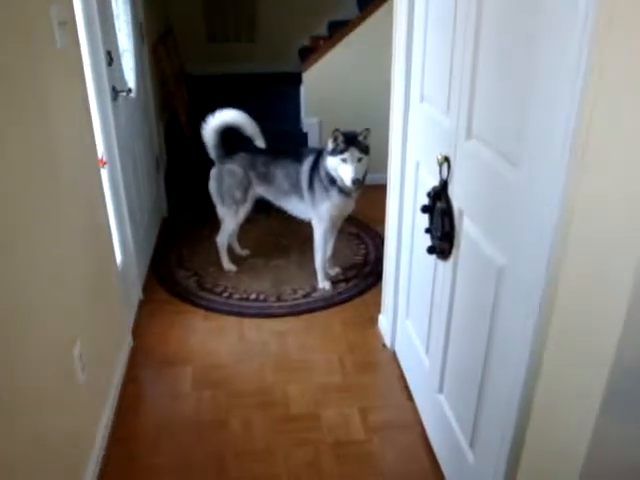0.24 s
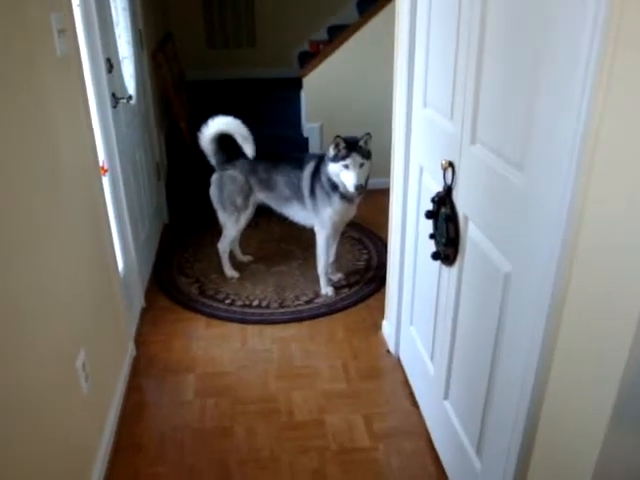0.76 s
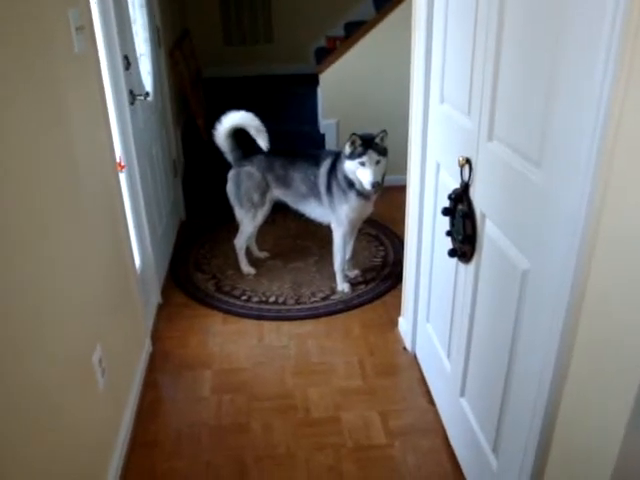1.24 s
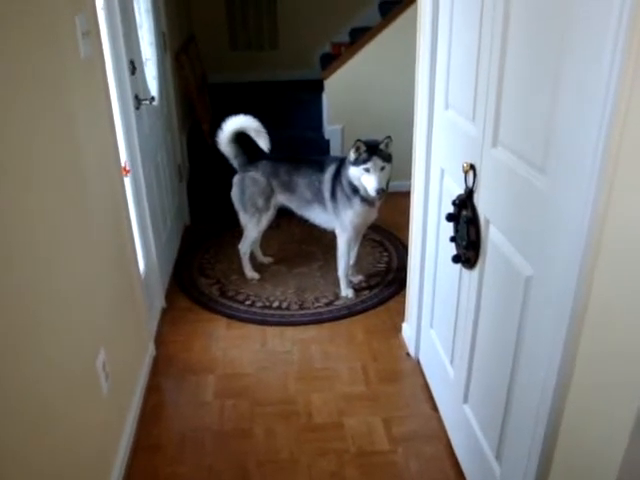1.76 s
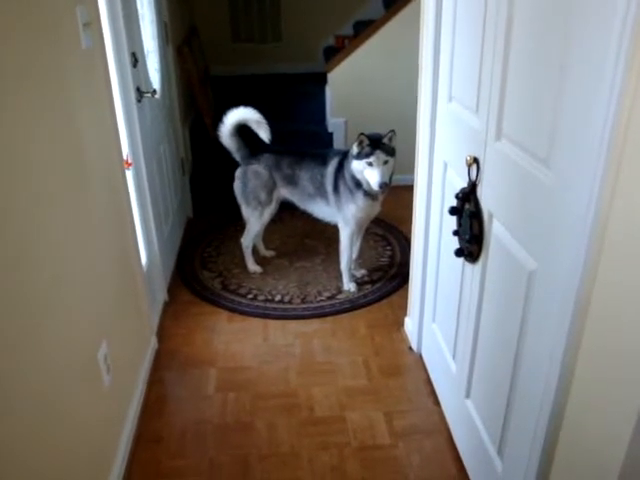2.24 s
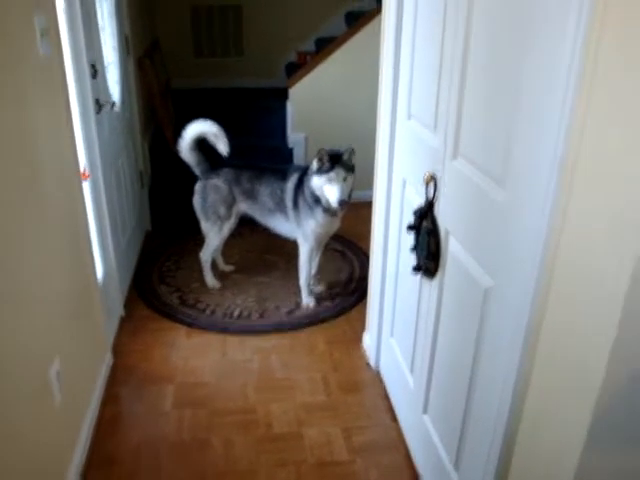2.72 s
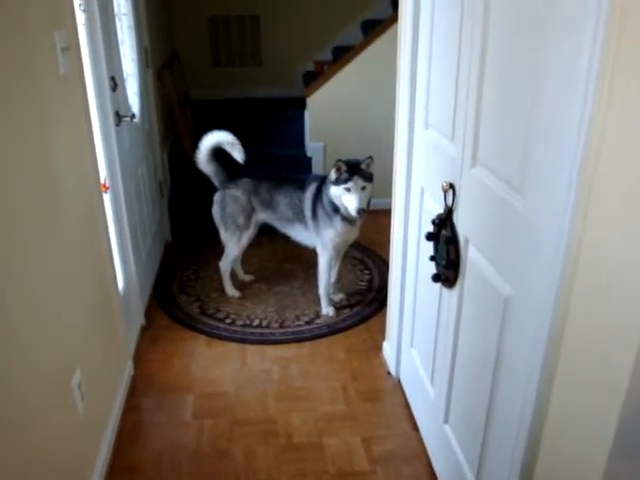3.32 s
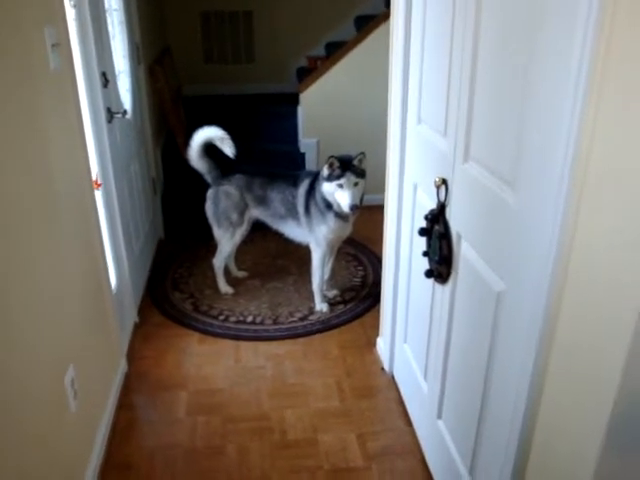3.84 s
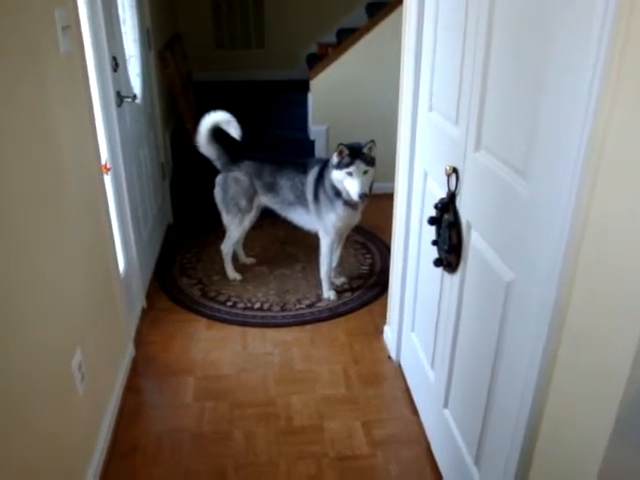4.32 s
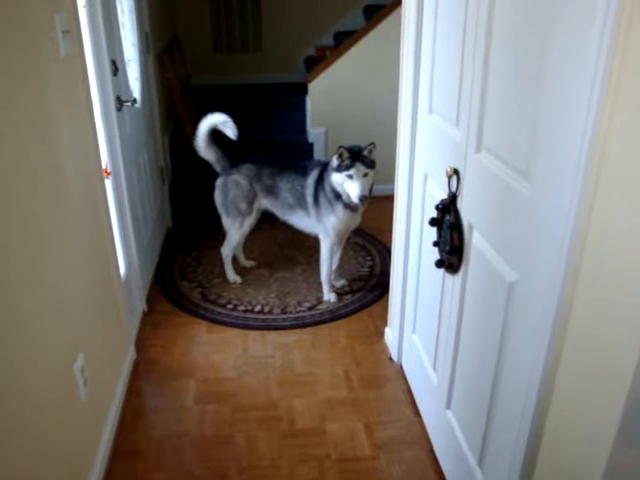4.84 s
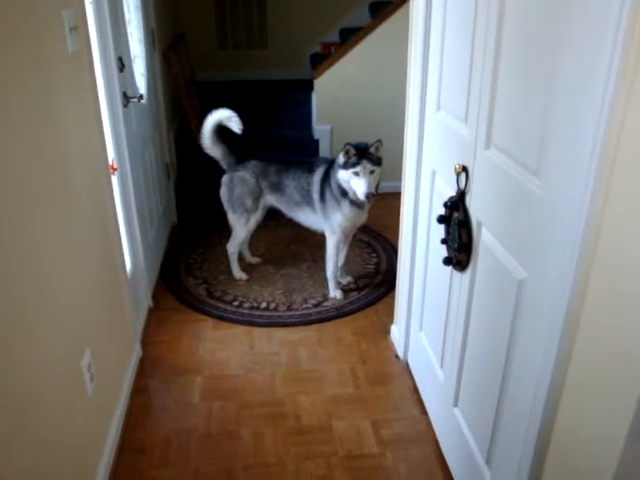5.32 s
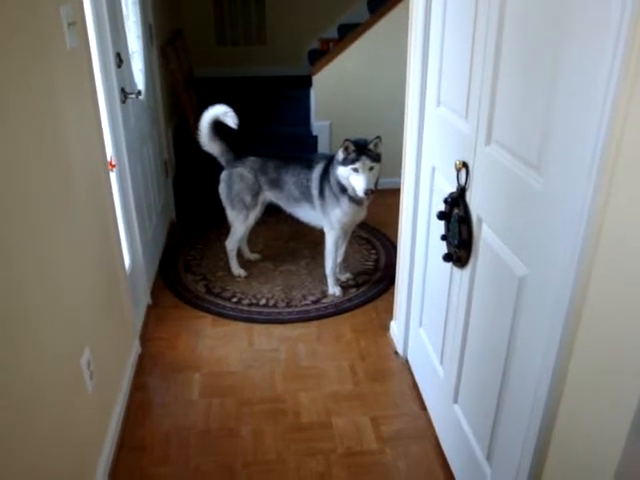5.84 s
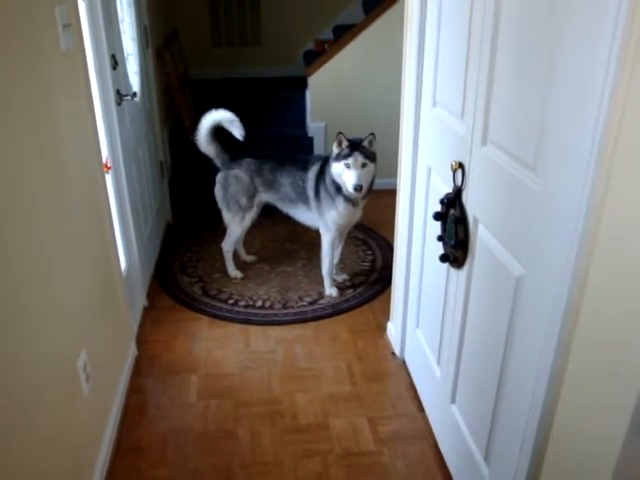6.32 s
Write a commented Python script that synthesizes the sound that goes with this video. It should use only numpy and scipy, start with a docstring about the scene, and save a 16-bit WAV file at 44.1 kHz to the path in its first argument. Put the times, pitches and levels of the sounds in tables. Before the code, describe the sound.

A dog's thin, whistling whines and squeaks come in a quick run, ringing briefly in a quiet house hallway.

```python
"""A husky whines far down a hard-floored hallway, heard on a small camera microphone over room hush.
It opens on a falling squeal; a yip, a puff through the nose and a squeal that snaps up to a squeak follow.
From 1 s come a whimper, yips, a short arch and another puff, then two more squeals, with dry clicks and
dull pops in the recorder. Two long arching whines at 4-5 s lead to a last yip, a puff and a whimper.
Each cry is a thin whistle in the throat, hoarse where it slides; the hall smears it into a short ring."""
import sys
import numpy as np
from scipy import signal
from scipy.fft import rfft, irfft
from scipy.io import wavfile
from scipy.ndimage import uniform_filter1d, minimum_filter1d

SR = 44100
rng = np.random.default_rng(int(sys.argv[2]) if len(sys.argv) > 2 else 0)


def pcm_store(signal):
    """Save signal as 16-bit PCM."""
    levels = np.round(np.clip(np.atleast_2d(signal), -1, 1) * 32767)
    wavfile.write(sys.argv[1], SR, levels.astype(np.int16).T)


N = 290178
TIME = np.arange(N) / SR

# Levels in the tables are relative. "Voice" is two columns: overtones [dB], open mouth [dB].
# yips: (start [s], length [s], low [Hz], top [Hz], hump [octaves], hump after [s], level [dB], voice)
YIP_CRIES = [(0.112, 0.12, 1098, 3130, 0.026, 0.0038, 0.5, 0, 5),
             (1.299, 0.12, 1113, 2914, 0.065, 0.00029, 1.5, -3, 15.5),
             (2.431, 0.081, 1129, 2740, 0.031, 0, 0, 0, 12), (3.18, 0.05, 1166, 2740, 0, 0.031, 4, 1, 6),
             (3.873, 0.17, 1202, 3030, 0.49, 0.069, 3.5, -1.5, 30),
             (4.511, 0.11, 1297, 3294, 0.44, 0.046, 3.5, 0, 23.5),
             (5.615, 0.056, 1196, 2647, 0, 0.019, 1.5, 3, 17.5)]
# squeals, the first already falling at 0 s: (start [s], climb [s], squeak [s], fall [s],
# climb from [Hz], climb to [Hz], squeak [Hz], level [dB], voice)
SQUEAL_CRIES = [(-0.15, 0.095, 0.035, 0.043, 1700, 2000, 5890, 0, 2, -5.5),
                (0.488, 0.24, 0.016, 0.045, 1727, 2074, 5680, -0.5, -1.5, 0),
                (2.766, 0.147, 0.033, 0.044, 1475, 1907, 4897, 0, -2.5, -8),
                (3.476, 0.11, 0.06, 0.045, 1739, 2174, 6390, 1, -3.5, -4.5)]
# arching whines: (start [s], rise [s], crest after [s], sinks after [s], fall [s], length [s],
# top [Hz], end [Hz], level [dB], voice)
ARCH_CRIES = [(1.492, 0.014, 0.012, 0.021, 0.066, 0.12, 2116, 1165, 0, -1, -1.5),
              (4.201, 0.042, 0.094, 0.133, 0.07, 0.2, 2158, 1102, 1, -2.5, 23.5),
              (4.852, 0.046, 0.118, 0.154, 0.056, 0.2, 2177, 1103, 3.5, -3, 17.5)]
# whimpers: (start [s], length [s], scoop [s], flick [octaves], level [dB], level slope [dB/s], voice)
WHIMPER_CRIES = [(0.995, 0.11, 0.0022, 0.013, 0, -100, -2.5, 3),
                 (5.938, 0.323, 0.022, 1.7, 4.5, -4, -4.5, 3.5)]
# one pitch curve for each whimper: (time [s], pitch [Hz])
WHIMPER_PITCHES = [
    [(1.003, 1323), (1.071, 1280), (1.097, 1234)],
    [(5.975, 1428), (5.991, 1493), (6.013, 1510), (6.065, 1357), (6.147, 1396), (6.153, 1266),
     (6.235, 1430), (6.265, 1218), (6.275, 1162)],
]
# the whistle speaks best near 2 kHz and is purest up high: (pitch [Hz], level [dB], second harmonic [dB])
WHISTLE_REGISTER = [(1068, -35, -6), (1329, -32.5, -5), (1560, -22.5, -13), (1955, -19.5, -12.5),
                    (2165, -16.5, -23.5), (3100, -19.5, -9), (4640, -26.5, -37), (5600, -38.5, -35)]
# colour the muzzle gives the overtones: (frequency [Hz], gain [dB])
MUZZLE_COLOUR = [(2300, 8), (3200, 2), (4200, 7), (5200, -2), (6200, 3), (7400, -10), (9000, 0.5)]
# opening the mouth lets the top through: (frequency [Hz], share of the open-mouth gain [0-1])
MOUTH_SHARE = [(4500, 0.0019), (6800, 0.32), (8600, 0.58)]
# air in the throat, open mouth and nose, and a nostril's whistle: (frequency [Hz], density [dB])
THROAT_AIR = [(700, -22), (1400, -3), (2800, 13), (4200, 3), (5500, -2), (7500, -8), (9500, -14)]
MOUTH_AIR = [(1500, -31.5), (5000, -32), (7000, -4), (8500, 5), (10000, -2)]
NOSE_HISS = [(200, -62), (1000, -37), (1900, -18.5), (2400, -7.5), (3100, -5), (3500, -4.5), (3900, -4),
             (4120, -8), (4400, 1), (4750, -7), (5200, -4.5), (5700, -17), (8000, -16.5), (10000, -24)]
NOSTRIL_WHISTLE = [(1000, -85), (3850, -38), (4090, -7), (4330, -47)]
# puffs through the nose: (start [s], attack [s], hold [s], release [s], hiss [dB], whistle [dB])
NOSE_PUFFS = [(0.208, 0.012, 0.014, 0.16, -51.5, -48.5), (1.935, 0.046, 0.12, 0.07, -40.5, -43),
              (5.842, 0.085, 0.035, 0.2, -36.5, -57)]
# dull pops and dry clicks in the recorder during the loud cries: (time [s], pop [dB], click [dB])
RECORDER_POPS = [(0.706, -32, -54), (2.907, -28, -16.5), (3.586, -40.5, -32), (3.744, -40.5, -15.5),
                 (3.915, -38.5, -35), (4.241, -42.5, -12), (4.306, -46, -33.5), (4.555, -40, -55)]
# colour of a pop and of its click: (frequency [Hz], density [dB])
POP_SPECTRUM = [(30, -36.5), (90, -13), (140, -12), (210, -2), (400, -0.5), (700, -13), (1200, -26),
                (3000, -66)]
CLICK_SPECTRUM = [(150, -35), (600, 5.5), (1500, -0.5), (5000, -4), (10000, -15.5)]
# first reflections off floor, door and walls: (delay [s], gain [ratio])
REFLECTIONS = [(.0031, 0.26), (.0074, 0.085), (0.013, 0.077)]
# ring of the hallway: (frequency [Hz], time to fall 60 dB [s])
HALL_DECAY = [(250, 0.81), (1200, 0.34), (2400, 0.29), (4500, 0.38), (9000, 0.29)]
# faint low bumps under the loudest cries: (time [s], level [dB])
LOW_BUMPS = [(4.05, -52.5), (4.305, -57), (4.386, -63), (4.935, -65), (4.985, -58)]
# rumble of the bumps and hush of the house: (frequency [Hz], density [dB])
RUMBLE_SPECTRUM = [(15, -9), (45, -4), (90, -5.5), (250, -37), (1000, -96)]
HUSH_SPECTRUM = [(15, -54), (25, -42.5), (81, -23), (164, -11), (482, -5), (588, -7.5), (756, -10.5),
                 (1050, -7.5), (1250, -12.5), (1730, -13.5), (3960, -19.5), (7400, -24), (9050, -23),
                 (10000, -29.5), (13000, -57.5), (22000, -120)]

SLACK_HZ = 1015.4  # pitch of the slack whistle


def whining(low_cut_hz=650):
    """All the dog's cries; so small a throat gives no bass."""
    cries = sum(yip(*row) for row in YIP_CRIES)
    cries += sum(squeal(*row) for row in SQUEAL_CRIES)
    cries += sum(arch(*row) for row in ARCH_CRIES)
    cries += sum(whimper(curve, *row) for curve, row in zip(WHIMPER_PITCHES, WHIMPER_CRIES))
    return signal.sosfilt(signal.butter(2, low_cut_hz, "highpass", fs=SR, output="sos"), cries)


def yip(start, length, low_hz, top_hz, hump_octaves, hump_at_s, level_db, *voice):
    """A low note eases up from slack, tightens ever faster, thins out and cuts off at the top."""
    t = since(start)
    hz = glide(low_hz, SLACK_HZ, np.exp(-t / 0.014))
    hz *= 2 ** (hump_octaves * bell(t - hump_at_s, width_s=0.028))
    strain = np.exp(np.minimum(t - length, 0) / 0.016)
    hz = glide(hz, top_hz, strain)
    return cry(start, length, hz, level_db - 5 * strain ** 2, *voice, release_s=0.0041, knee=34)


def squeal(start, climb_s, squeak_s, fall_s, from_hz, to_hz, squeak_hz, level_db, *voice,
           snap_s=0.0074, sag_octaves_per_s=4.5, collapse_s=0.093):
    """A climbing whine snaps up into a thin squeak, sags and collapses."""
    t = since(start)
    hz = glide(from_hz, to_hz, np.minimum(t / climb_s, 1))
    hz = glide(hz, squeak_hz, np.exp(np.minimum(t - climb_s, 0) / snap_s))
    hz *= 2 ** (-sag_octaves_per_s * np.clip(t - climb_s, 0, squeak_s))
    hz = glide(SLACK_HZ, hz, np.exp(-np.maximum(t - climb_s - squeak_s, 0) / fall_s))
    hz = catch(t, hz, scoop_s=0.012)
    length = climb_s + squeak_s + collapse_s
    return cry(start, length, hz, level_db + push(t), *voice, release_s=0.006, knee=37.6)


def arch(start, rise_s, crest_s, sink_s, fall_s, length, top_hz, end_hz, level_db, *voice,
         crest_octaves_per_s2=21):
    """A whine rounds over its top note without snapping, then sinks."""
    t = since(start)
    crest_hz = top_hz * 2 ** (-crest_octaves_per_s2 * (t - crest_s) ** 2)
    height = np.exp(-(np.maximum(t - sink_s, 0) / fall_s) ** 1.5)  # the power rounds the shoulder
    hz = catch(t, glide(end_hz, crest_hz, height), rise_s)
    return cry(start, length, hz, level_db + push(t), *voice, release_s=0.054, knee=42)


def whimper(curve, start, length, scoop_s, flick_octaves, level_db, db_per_s, *voice,
            droop_octaves_per_s=10):
    """A low wavering note fades and droops at the end."""
    t = since(start)
    times, notes = np.transpose(curve)
    hz = np.interp(start + t, times, notes)
    hz *= 2 ** (-droop_octaves_per_s * np.maximum(start + t - times[-1], 0))
    hz = catch(t, hz, scoop_s, flick_octaves)
    return cry(start, length, hz, level_db + push(t) + db_per_s * t, *voice, release_s=0.027, knee=33)


def catch(t, hz, scoop_s, flick_octaves=1.45, flick_s=0.0034):
    """A cry catches high, flicks down toward the slack pitch, then scoops up to its note."""
    scooped_hz = glide(hz, SLACK_HZ, np.exp(-(t / scoop_s) ** 3))
    return scooped_hz * 2 ** (flick_octaves * np.exp(-t / flick_s))


def push(t):
    """The push of air as a cry catches, in dB of extra level."""
    return 10 * bell(t, width_s=0.0079)


def cry(start, length, pitch, level_db, overtones_db, mouth_db, release_s, knee):
    """A whistle in the throat: clean while its pitch holds, hoarse and airy while it slides."""
    t = start + since(start)
    size, first = len(t), int(round(t[0] * SR))
    hoarse = hoarseness(pitch, knee)
    hz = 2 ** uniform_filter1d(np.log2(pitch), size=180)
    jitter = (0.0046 + 0.0359 * hoarse) * wander(650, size)
    phase = 2 * np.pi * np.cumsum(hz * (1 + jitter)) / SR
    notes, note_db, harmonic_db = np.transpose(WHISTLE_REGISTER)
    second_db = np.interp(hz, notes, harmonic_db) + overtones_db + 1 - 5 * hoarse ** 2
    open_db = mouth_db - 5 * np.log2(hz / 1600) + 3 * hoarse
    tone = np.sin(phase) + overtones(phase, hz, hoarse, second_db, open_db) + period_doubling(t, phase)
    # turbulence shakes the tone and spreads a skirt of noise round every line
    rasp = (0.031 + 0.39 * hoarse) * wander(900, size)
    tone *= undb(-4 * hoarse ** 2) * (1 + rasp)
    air = breath(hoarse, second_db, open_db)
    shimmer_db = 2.45 * wander(119, size)
    envelope = undb(np.interp(hz, notes, note_db) + level_db - 3 + shimmer_db)
    envelope *= gate(t, start, start + length, rise_s=0.0059, fall_s=release_s)
    out = np.zeros(N)
    out[first:first + size] = (np.sqrt(2) * tone + air) * envelope
    return out


def hoarseness(hz, knee):
    """The tone breaks up, 0 clean to 1 hoarse, as its slide outruns the knee (octaves a second)."""
    octaves_per_s = np.abs(np.gradient(np.log2(hz))) * SR
    return np.tanh(uniform_filter1d(octaves_per_s, size=500) / knee)


def overtones(phase, hz, hoarse, second_db, open_db):
    """Harmonics 2-9 through the muzzle; they fall off faster when the whistle is high or hoarse."""
    db_per_octave = -10 - 4 * hoarse - 4 * np.log2(hz / 1200)
    out = 0
    for k in range(2, 10):
        muzzle_db = at_hz(MUZZLE_COLOUR, k * hz) + open_db * at_hz(MOUTH_SHARE, k * hz)
        flicker_db = 4.2 * wander(93, len(hz))
        db = second_db + db_per_octave * np.log2(k / 2) + muzzle_db + flicker_db
        out += undb(db) * np.sin(k * phase) * (k * hz < SR / 3)
    return out


def period_doubling(t, phase):
    """In one whine strong and weak cycles briefly alternate, adding lines at 1/2 and 3/2 of the pitch."""
    depth = undb(-20) * gate(t, start=4.275, end=4.35, rise_s=0.035, fall_s=0.013)
    return depth * (np.sin(1.5 * phase) + 0.39 * np.sin(phase / 2))


def breath(hoarse, second_db, open_db):
    """Air rushes through the throat and open mouth, more so as the tone breaks up."""
    throat_gain = undb(-32 + 0.5 * second_db) + undb(-4.5) * hoarse ** 2
    mouth_gain = undb(-32 + open_db + 0.14 * second_db)
    return throat_gain * noise(THROAT_AIR, len(hoarse)) + mouth_gain * noise(MOUTH_AIR, len(hoarse))


def nose(gain_db=4):
    """Air forced through the nostrils: a hiss with a thin whistle in it."""
    hiss, whistle = noise(NOSE_HISS, N), noise(NOSTRIL_WHISTLE, N)
    out = 0
    for start, attack, hold, release, hiss_db, whistle_db in NOSE_PUFFS:
        flow = np.interp(TIME, start + np.cumsum([0, attack, hold, release]), [0, 1, 1, 0])
        out += flow * (undb(hiss_db) * hiss + undb(whistle_db) * whistle)
    return out * undb(gain_db + wander(50, N))


def recorder_pops(pop_s=0.0059, click_s=0.00034, size=4096):
    """Dull pops in the recorder during the loud cries, each with a short dry click on top."""
    pops, clicks = np.zeros((2, N))
    t = TIME[:size]
    for start, pop_db, click_db in RECORDER_POPS:
        span = slice(int(start * SR), int(start * SR) + size)
        pops[span] += undb(pop_db) * np.exp(-t / pop_s) * rng.standard_normal(size)
        clicks[span] += undb(click_db) * np.exp(-t / click_s) * rng.standard_normal(size)
    return colour(pops, POP_SPECTRUM) + colour(clicks, CLICK_SPECTRUM)


def hall(x, ring_db=-3, build_s=0.0024, flurry_db=-9, flurry_s=0.0082, size=32768):
    """Down the hallway: direct sound, three reflections, a flurry between close walls, a diffuse ring."""
    t = TIME[:size]
    spectrum, hz = rfft(rng.standard_normal(size)), np.fft.rfftfreq(size, 1 / SR)
    centres, decays = np.transpose(HALL_DECAY)
    ring = 0
    for share, t60 in zip(np.eye(len(centres)), decays):
        band = irfft(spectrum * at_hz(np.c_[centres, share], hz), size)
        ring += band * undb(-60 * t / t60)
    ring *= np.clip(t / build_s - 0.5, 0, 1)
    flurry = rng.standard_normal(size) * np.sqrt(t) * np.exp(-t / flurry_s)
    response = (undb(ring_db) * unit(ring) + undb(flurry_db) * unit(flurry)) / np.sqrt(size)
    response[0] += 1
    for delay, gain in REFLECTIONS:
        response[int(delay * SR)] += gain
    return signal.fftconvolve(x, response)[:N]


def bumps():
    """Short, faint swells of deep rumble."""
    swell = sum(undb(db) * bell(TIME - at_s, width_s=0.016) for at_s, db in LOW_BUMPS)
    return swell * noise(RUMBLE_SPECTRUM, N)


def room_tone(level_db=-53):
    """The steady hush of the house."""
    return undb(level_db) * noise(HUSH_SPECTRUM, N)


def since(start, size=21000):
    """Seconds since the start, over the stretch that one cry can fill."""
    return TIME[max(0, int(start * SR) + 1):][:size] - start


def glide(from_hz, to_hz, share):
    """The pitch a share of the way from one note to another."""
    return from_hz * (to_hz / from_hz) ** share


def gate(t, start, end, rise_s, fall_s):
    """Opens from start and closes after end."""
    return np.clip((t - start) / rise_s, 0, 1) * np.clip(1 - (t - end) / fall_s, 0, 1)


def bell(t, width_s):
    """A smooth hump of height 1 at t = 0."""
    return np.exp(-(t / width_s) ** 2)


def wander(rate, size):
    """Random drift of spread near 1 that turns about rate times a second."""
    return np.interp(TIME[:size] * rate, np.arange(size), 1.2 * rng.standard_normal(size))


def noise(points, size):
    """Noise of rms near 1 with the given spectrum."""
    return colour(rng.standard_normal(size), points)


def colour(x, points):
    """Filter by a (frequency [Hz], gain [dB]) curve, keeping the power of white noise."""
    gain = undb(at_hz(points, np.fft.rfftfreq(len(x), 1 / SR)))
    return irfft(rfft(x) * unit(gain), len(x))


def at_hz(points, hz):
    """Read a curve on a log-frequency axis."""
    frequencies, values = np.transpose(points)
    return np.interp(np.log(np.maximum(hz, 1)), np.log(frequencies), values)


def undb(db):
    """Decibels to gain."""
    return 10 ** (np.asarray(db) / 20)


def unit(x):
    """Scale to rms 1."""
    return x / np.sqrt(np.mean(x ** 2))


def scene(pop_send=0.46):
    """In mono: the dog far down the hall, the recorder's pops mostly dry, the hush behind."""
    dog = whining() + nose()
    pops = recorder_pops()
    return (hall(dog + pop_send * pops) + pops + bumps() + room_tone())[None]


def record(dry, ceiling_db=-7, top_hz=10100):
    """A small camera microphone: a limiter holds the peaks down and the treble cuts off steeply."""
    needed_gain = np.minimum(1, undb(ceiling_db) / (np.abs(dry) + 1e-9))
    limited = dry * uniform_filter1d(minimum_filter1d(needed_gain, size=400), size=300)
    return signal.sosfilt(signal.ellip(12, 0.2, 80, top_hz, fs=SR, output="sos"), limited)


dry = scene()
out = record(dry)
pcm_store(out)
```